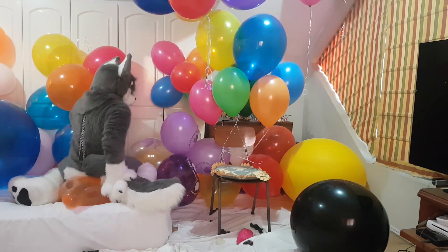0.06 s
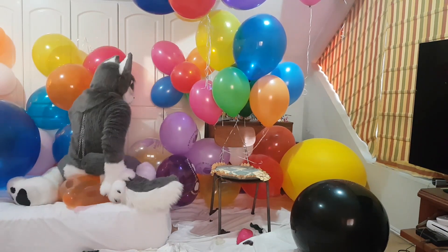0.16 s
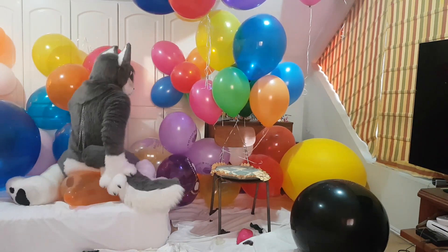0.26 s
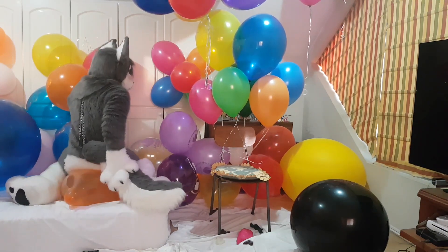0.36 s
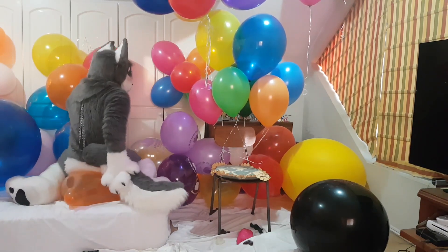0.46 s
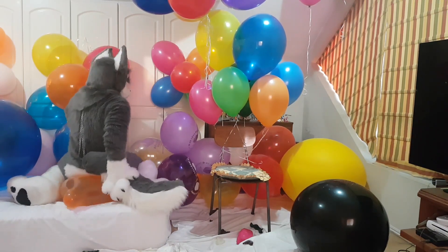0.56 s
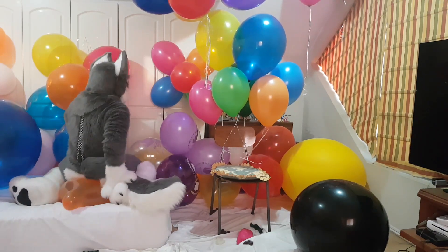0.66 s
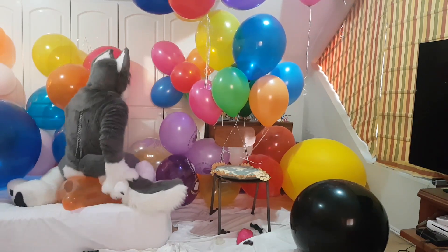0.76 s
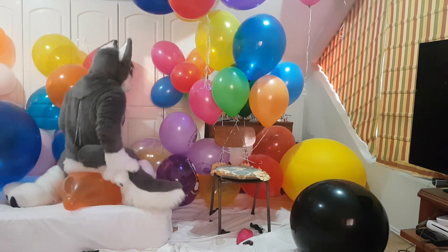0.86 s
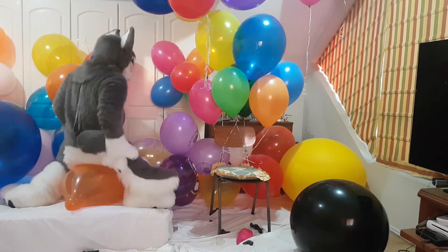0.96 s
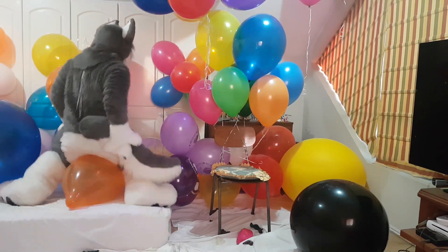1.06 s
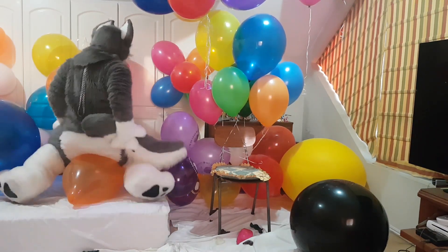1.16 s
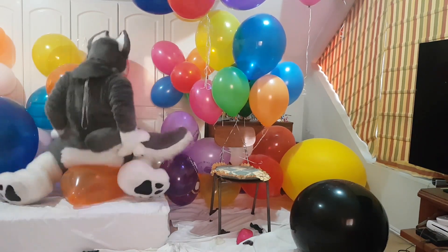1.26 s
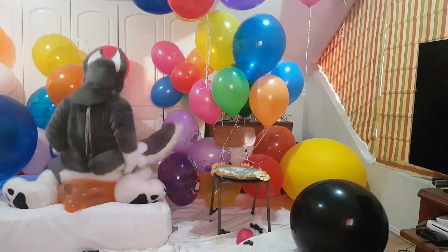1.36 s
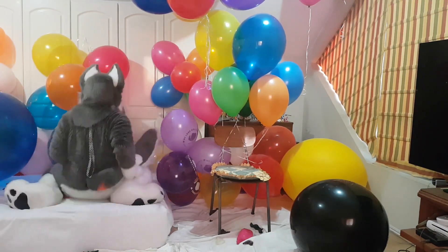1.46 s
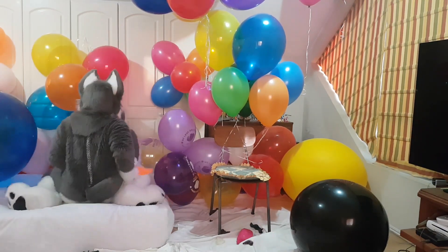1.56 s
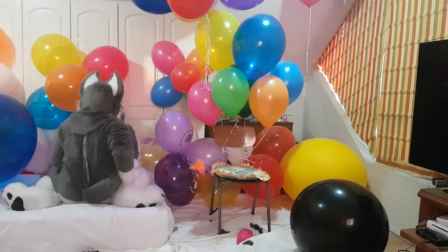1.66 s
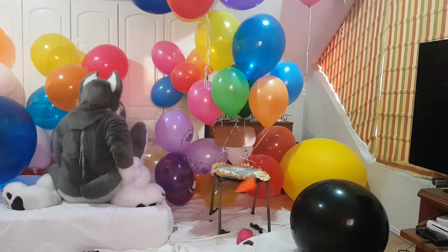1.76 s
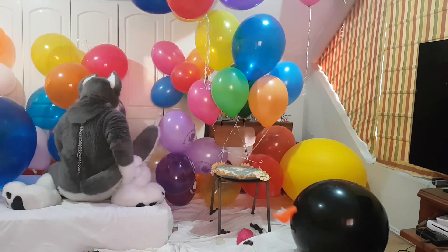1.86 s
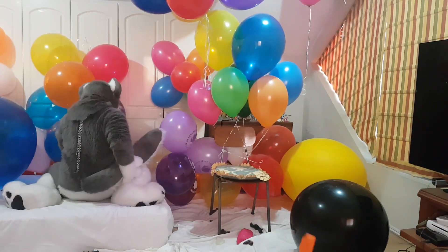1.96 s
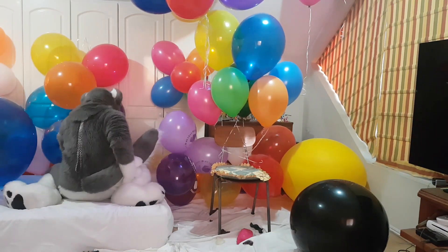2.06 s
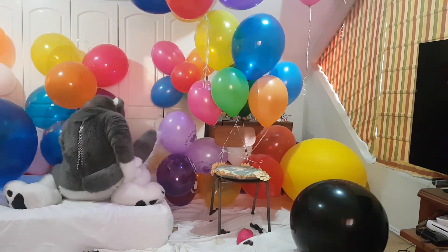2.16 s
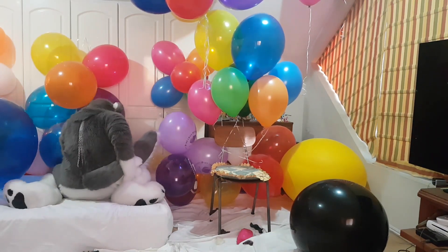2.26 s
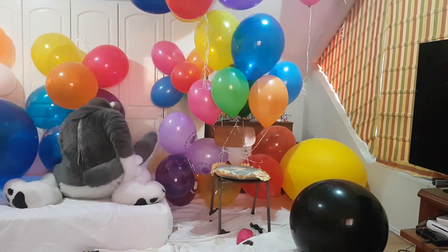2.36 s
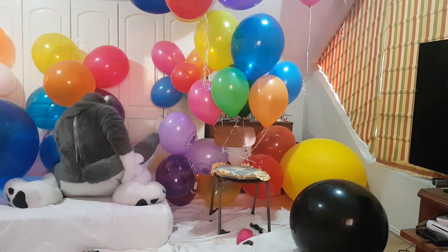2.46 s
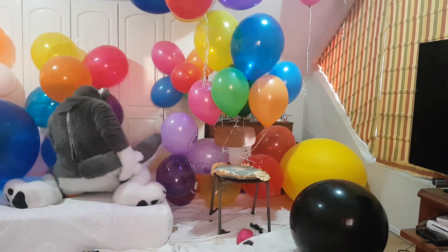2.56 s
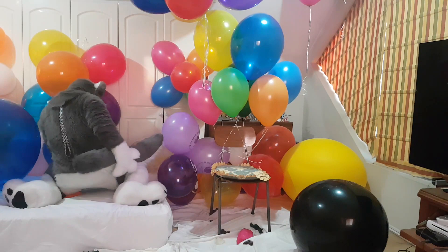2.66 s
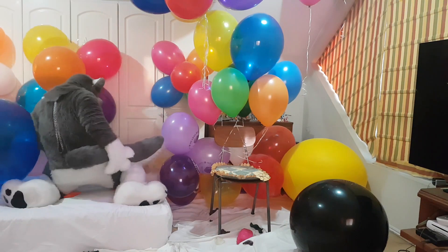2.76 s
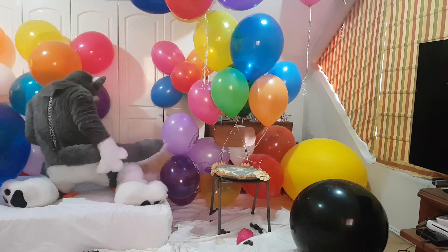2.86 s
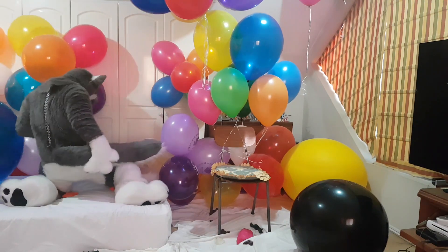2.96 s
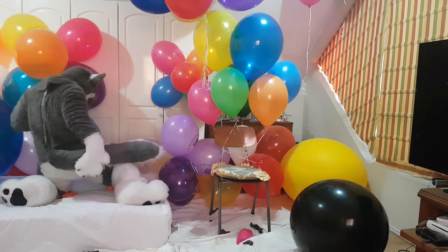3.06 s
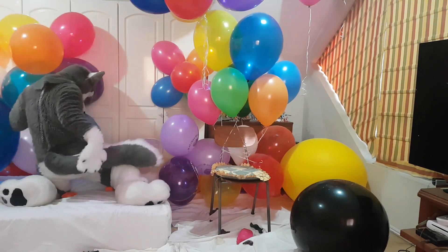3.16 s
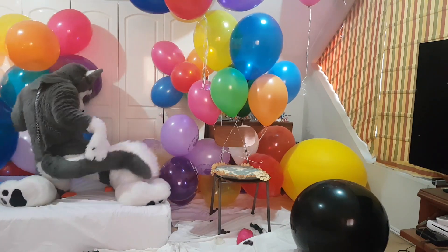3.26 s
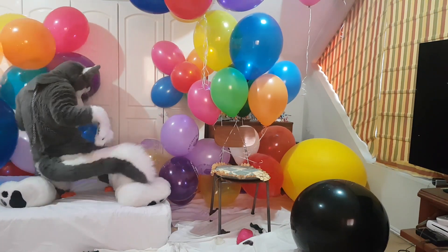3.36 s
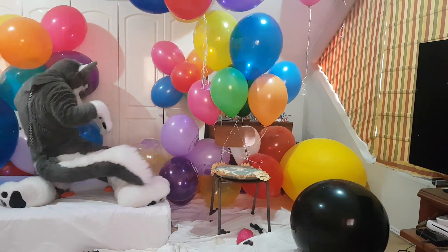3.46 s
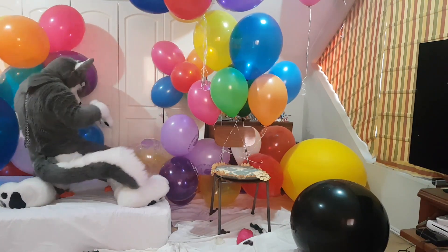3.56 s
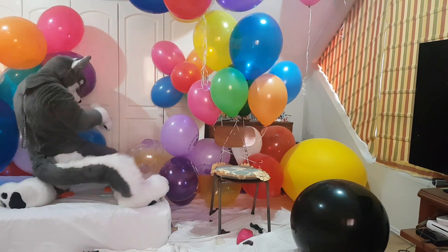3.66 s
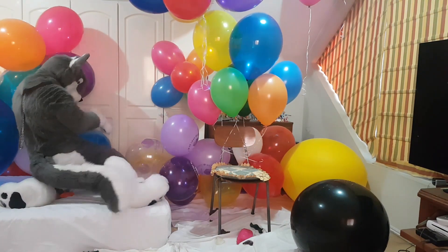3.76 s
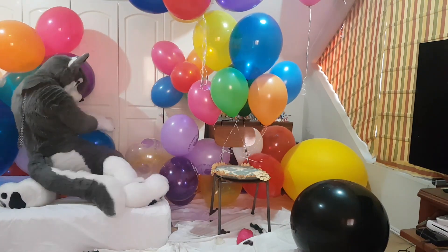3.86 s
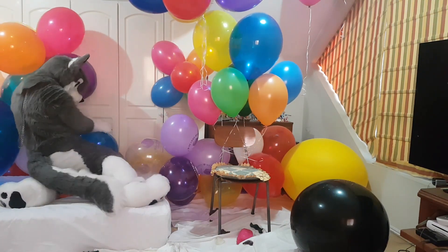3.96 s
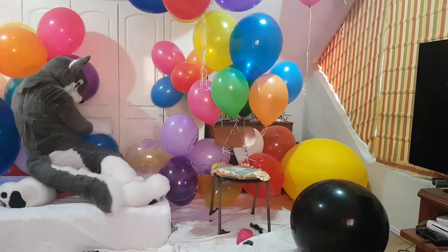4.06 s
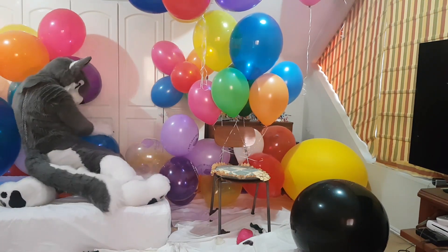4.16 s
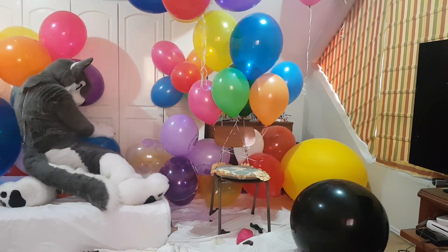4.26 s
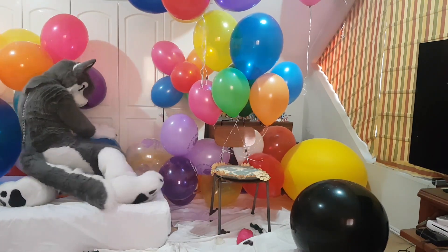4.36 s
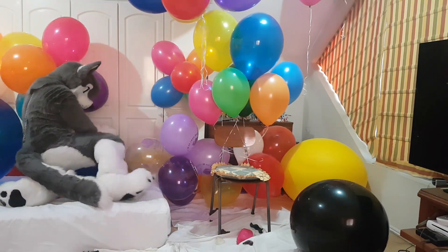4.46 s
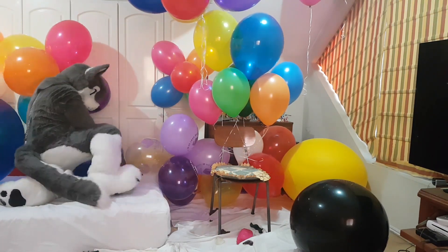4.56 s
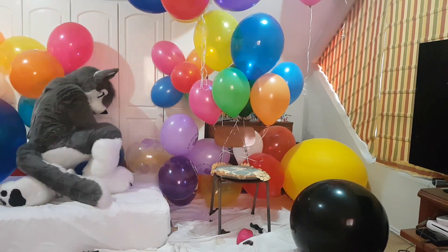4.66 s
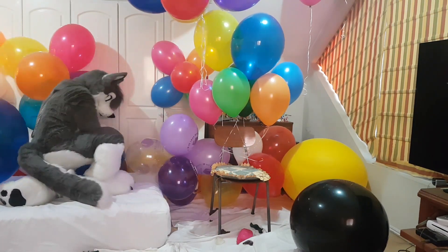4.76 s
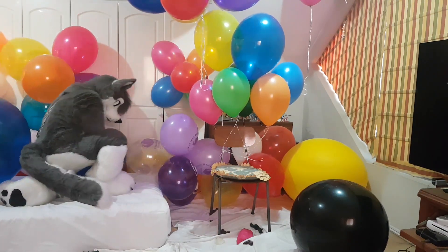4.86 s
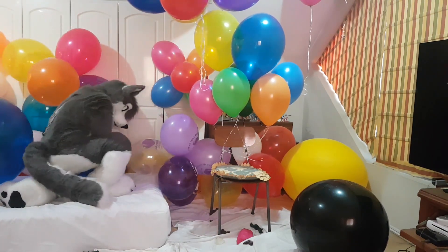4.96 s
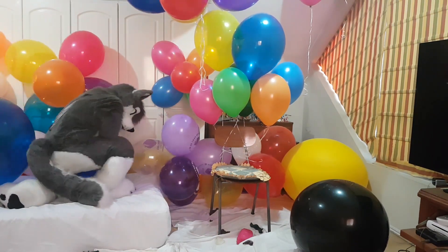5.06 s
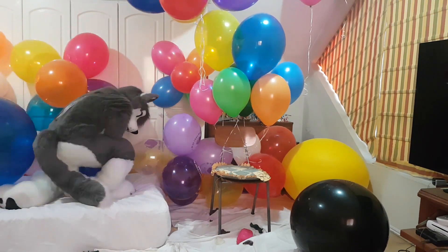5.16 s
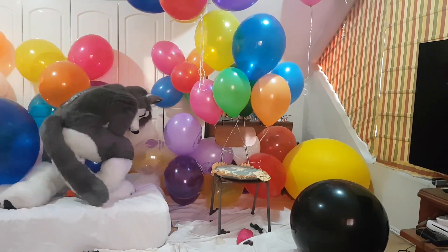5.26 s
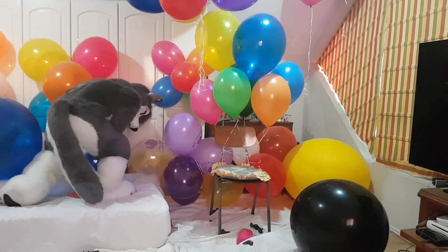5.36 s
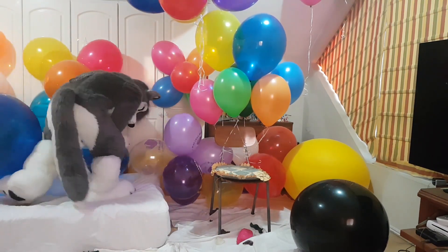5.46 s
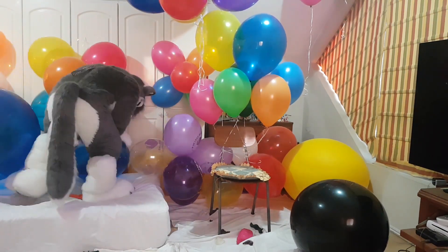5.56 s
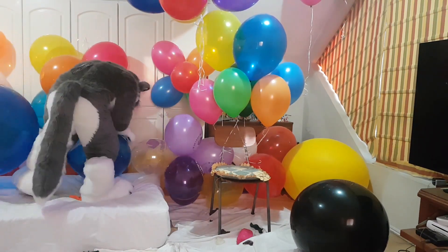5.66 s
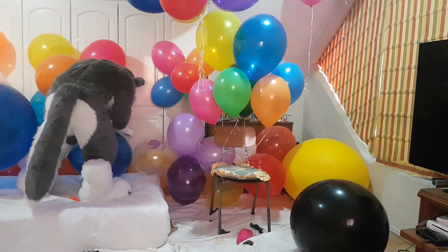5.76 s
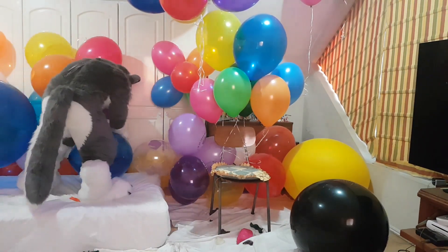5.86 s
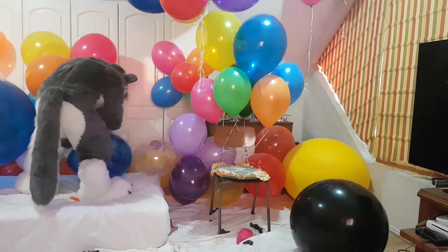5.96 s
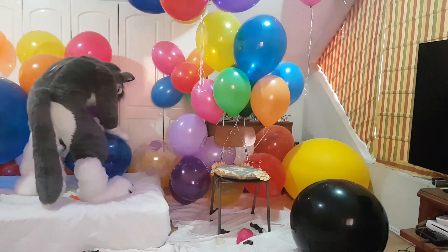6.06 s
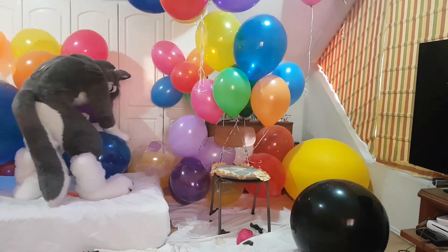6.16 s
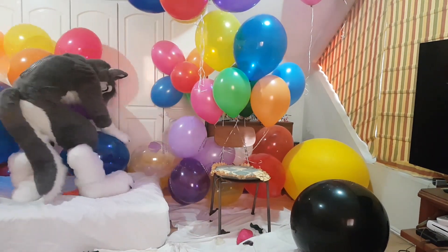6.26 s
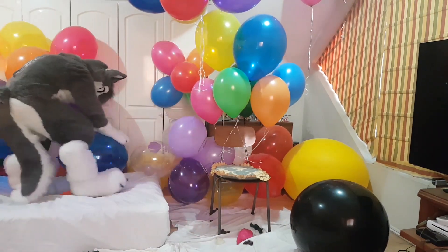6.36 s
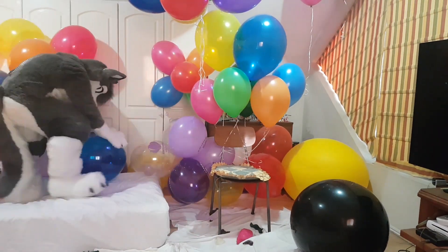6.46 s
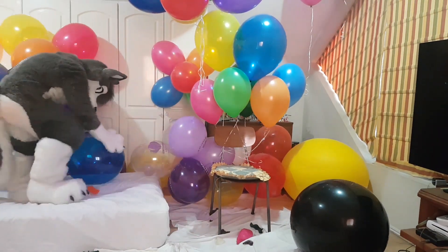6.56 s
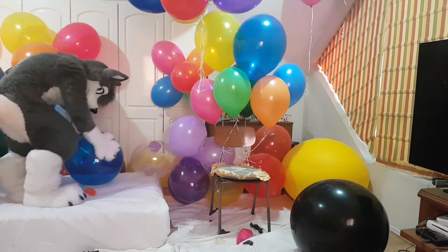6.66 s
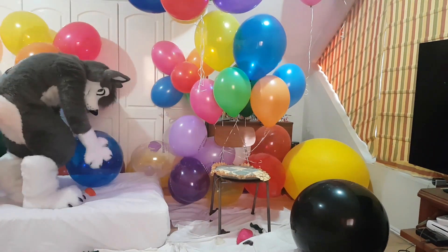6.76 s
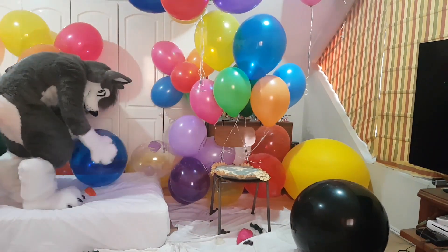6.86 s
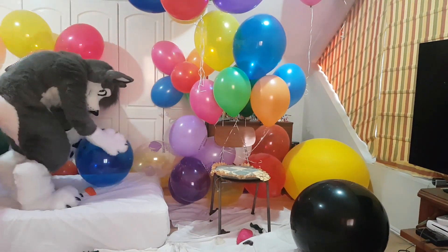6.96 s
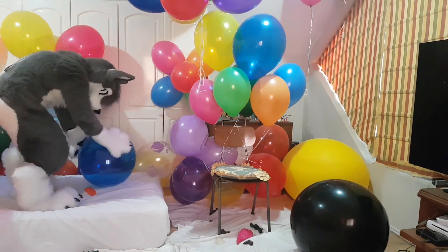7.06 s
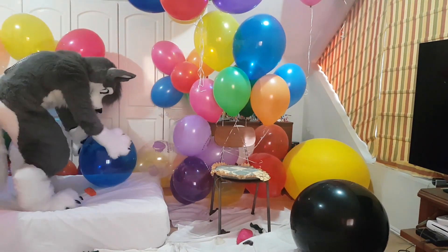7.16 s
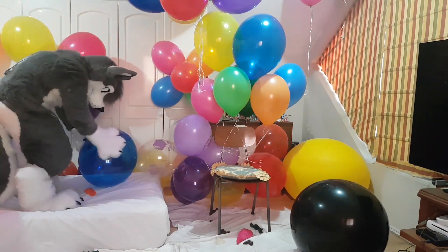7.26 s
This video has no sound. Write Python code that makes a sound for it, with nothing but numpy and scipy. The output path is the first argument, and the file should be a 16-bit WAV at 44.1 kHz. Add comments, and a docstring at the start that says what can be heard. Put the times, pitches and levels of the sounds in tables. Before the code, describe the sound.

In a small room, close stereo microphones catch very quiet fur and bedding rustle. Short, low rubbery creaks come at 0.25 to 0.7 seconds, with a small one near 1.2 as weight shifts softly. At 1.51 a large balloon bursts: a sudden, full-scale, distorted bang with a low push of air, a harsh broadband crack, quick wall echoes and a hollow ring from room and balloons, dying within about half a second. A heavy padded body thump on the mattress merges into it at 1.57. From 2 to 3 it is nearly silent. Faint rustles and light bumps return from 3, with a squeak at 3.8 and a dull creak at 4.5. Around 5.2 a short low latex groan sings out. Bright chirping squeaks follow at 5.55 and 6.0, a rougher squeak with fur brushing at 6.8, then a quick rising squeak near 7.2 amid soft bumps.

```python
"""A large balloon bursts under someone in a fur suit, who drops onto the mattress, close to two microphones.
The freed air pushes and sucks back, its crack scatters round a small room, and other balloons ring on.
Fur and bedding rustle as shaped noise with drawn levels; soft blows ring the bed and press out air.
Latex creaks and squeaks by sticking and slipping as the next balloon is pulled into place.
The bang overloads the recorder, and the rustle behind it is turned down and slowly recovers."""
import sys
import numpy as np
from scipy import signal
from scipy.fft import rfft, irfft
from scipy.io import wavfile
from scipy.ndimage import uniform_filter1d

SR = 44100
rng = np.random.default_rng(int(sys.argv[2]) if len(sys.argv) > 2 else 0)


def generate_wav(signal):
    """Clip the signal to [-1, 1] and save it as 16-bit WAV at the path in sys.argv[1]."""
    frames = np.transpose(np.atleast_2d(signal))
    scaled = np.clip(frames, -1, 1) * 32767
    pcm = np.round(scaled).astype(np.int16)
    wavfile.write(sys.argv[1], SR, pcm)


N = 322812
TIME = np.arange(N) / SR
MIC_SPACING_M = 0.17
EDGE_HZ = 14750  # top of the recorder's band

# Weight shifting onto the bed. Each row: start in seconds, relative knock level in dB,
# relative level of the mattress heave in dB.
SHIFTS_OF_WEIGHT = [(1.234, -41.5, -59), (1.425, -39, -48), (1.641, -9, -45), (3.031, -45, -57),
                    (3.23, -52.5, -63), (3.658, -46, -60), (3.81, -51, -56), (4.02, -53, -56),
                    (4.546, -37.5, -66), (5.78, -49.5, -58), (5.991, -41.5, -46), (6.55, -33, -43),
                    (6.844, -34, -40), (7.096, -37, -42)]
# Level of the bedding rustle: the body's effort, and a recorder turned down by the bang that slowly recovers.
# Each row: time in seconds, relative level in dB.
RUSTLE_LEVEL = [(0, -61), (.8, -61), (1.45, -56.5), (1.95, -67), (2.35, -73.5), (2.8, -66.5), (3.55, -64),
                (3.85, -58.5), (4.5, -53.5), (4.88, -60), (5.2, -53), (5.85, -50.5), (6.25, -55.5),
                (6.52, -45.5), (6.72, -51), (6.9, -44.5), (7.05, -53), (7.32, -55)]


def amp(db):
    """Decibels to gain."""
    return 10 ** (np.asarray(db) / 20)


def unit(x):
    """Scales to rms 1."""
    return x / np.sqrt(np.mean(x ** 2) + 1e-20)


def read(points, hz):
    """Reads a table on a log-frequency axis."""
    f, value = np.transpose(points)
    return np.interp(np.log(hz + 1), np.log(f + 1), value)


def bins(size):
    """Frequencies of a spectrum of this many samples."""
    return np.fft.rfftfreq(size, 1 / SR)


def add(mix, s, sound):
    """Mixes a sound in at time s."""
    part = mix[..., max(round(s * SR), 0):][..., :sound.shape[-1]]
    part += sound[..., :part.shape[-1]]


def wander(size, hz):
    """Slow chance of about rms 1, mostly below hz."""
    noise = rfft(rng.standard_normal(N))
    slow = irfft(noise / (1 + (bins(N) / hz) ** 4), N)
    return unit(slow)[:size]


def diffuse(spectrum, size, likeness=.8):
    """Noise from all sides at two spaced microphones: alike in the bass, unrelated in the treble."""
    hz = bins(size)
    mid, side = rfft(rng.standard_normal((2, size)))
    same = np.clip(likeness, 0, 1) * np.sinc(2 * hz * MIC_SPACING_M / 343)  # speed of sound in m/s
    mid, side = mid * np.sqrt(1 + same), side * np.sqrt(1 - same)
    pair = np.array([mid + side, mid - side])
    return unit(irfft(pair * amp(read(spectrum, hz)), size))


def patchy(x, patchy_db):
    """Ever-changing strength favours small patches of time and frequency, as shifting contacts do."""
    z = signal.stft(x, nperseg=512, noverlap=384)[2]
    patches = rng.standard_normal(z.shape[1:])
    patches = uniform_filter1d(patches, size=4, axis=0)  # across frequency
    patches = unit(uniform_filter1d(patches, size=12, axis=1))  # across time
    uneven = signal.istft(z * amp(patchy_db * patches), nperseg=512, noverlap=384)[1]
    return unit(uneven[:, :N])


def die_away(x):
    """Each band fades at the room's own speed."""
    # Decay of the small room. Each row: frequency in Hz, time to fall 60 dB in seconds.
    room_decay = [(60, 0.34), (200, 0.39), (500, .31), (1000, 0.35), (2500, 0.27), (8000, 0.33),
                  (14000, .24)]
    hz, t, z = signal.stft(x, SR, nperseg=256)
    fade = np.exp(-np.log(1000) * t / read(room_decay, hz)[:, None])
    return signal.istft(z * fade, SR, nperseg=256)[1][:, :x.shape[1]]


def in_room(x, wet_db):
    """Direct sound, then the room's scatter; the body shades the direct treble, so treble is wetter."""
    tail = die_away(diffuse([(300, -6.5), (1200, -5)], size=SR))
    tail[:, :round(.003 * SR)] = 0
    response = amp(wet_db) * tail / np.linalg.norm(tail[0])
    response[:, 0] += 1
    response = response / np.linalg.norm(response[0])
    return signal.fftconvolve(x[None], response, axes=1)[:, :N]


def colour(x, gain):
    """A causal filter from a gain at each whole Hz; the result has rms 1."""
    log_gain = np.log(np.maximum(gain, 1e-5))
    mirrored = np.r_[log_gain, log_gain[-2:0:-1]]
    response = np.exp(signal.hilbert(mirrored).conj())[:len(gain)]  # minimum phase
    return unit(irfft(rfft(x, SR) * response, SR)[:len(x)])


def ring(modes, apart_hz=700):
    """Dying sines after one blow; higher modes differ more in phase between the microphones, to a limit."""
    t, out = TIME[:2 * SR], 0
    for k, (hz, db, t60) in enumerate(modes):
        sign = (-1) ** k
        lead = np.array([[1], [-1]]) * sign * min(hz / apart_hz, np.pi / 4)  # radians
        decay = np.exp(-np.log(1000) * t / t60)
        out = out + sign * amp(db) * decay * np.sin(2 * np.pi * hz * t + lead)
    return out


def loading(sway_db=-24, sway_follow=.7, heave_s=0.035):
    """Levels of bedding and mattress: both follow the rustle level; the mattress heaves after each thump."""
    rustle_db = np.interp(TIME, *np.transpose(RUSTLE_LEVEL))
    mattress_power = amp(sway_db + sway_follow * rustle_db) ** 2
    u = TIME[:SR] / heave_s
    for s, _, heave_db in SHIFTS_OF_WEIGHT:
        heave = amp(heave_db) * u * np.exp(1 - u)
        add(mattress_power, s, heave ** 2)
    return amp(rustle_db), np.sqrt(mattress_power)


def sliding(fidget_fur_db=-11.5, fidget_rub_db=-5.5, ends_db=-9.5, roundness=2.14, rise_s=0.02, decay_s=.043):
    """Levels of fur hiss and latex rubbing: movements swell and ebb in a bell, brushes flick and die."""
    # The body shifts, sliding fur over sheets and balloons. Each row: start in seconds, swell in seconds,
    # fade in seconds, relative fur hiss level in dB, relative latex rubbing level in dB.
    body_moves = [(-0.11, 0.17, 0.14, -59, -62), (0.2, 0.17, 0.49, -59, -62.5),
                  (0.8, 0.33, 0.21, -51.5, -57.5), (1.38, 0.16, 0.055, -44.5, -48),
                  (2.35, 0.33, 0.24, -66.5, -64.5), (2.69, 0.34, 0.18, -55.5, -52.5),
                  (3.14, 0.14, 0.15, -53.5, -49.5), (3.381, 0.044, 0.24, -64.5, -54.5),
                  (3.64, 0.13, 0.31, -57.0, -55.0), (4.0, 0.36, 0.28, -58.5, -59.5),
                  (4.46, 0.057, 0.19, -56.5, -52.0), (4.69, 0.29, 0.25, -67.5, -59.5),
                  (5.05, 0.14, 0.13, -54.5, -46.0), (5.29, 0.12, 0.13, -55, -45),
                  (5.59, 0.22, 0.14, -65, -48.5), (5.94, 0.07, 0.27, -53.5, -47),
                  (6.16, 0.35, 0.13, -51.0, -44.0), (6.59, 0.17, 0.22, -51, -56.5),
                  (7.01, 0.19, 0.38, -56.5, -49.5)]
    # Quick brushes of fur. Each row: start in seconds, relative level in dB.
    fur_brushes = [(0.372, -44.5), (0.492, -59), (1.428, -55), (3.514, -56.5), (3.789, -47.5), (5.14, -50),
                   (5.554, -43.5), (5.998, -47.5), (6.447, -38.5), (6.529, -45), (6.715, -42.5),
                   (6.738, -43.0), (6.812, -34)]
    # Sliding that goes on between movements is set relative to the bedding rustle.
    rustle_db = np.interp(TIME, *np.transpose(RUSTLE_LEVEL))
    fur_power, rub_power = amp(rustle_db + fidget_fur_db) ** 2, amp(rustle_db + fidget_rub_db) ** 2
    for s, swell, fade, fur_db, rub_db in body_moves:
        late = TIME - s - swell
        from_peak = np.minimum(np.maximum(-late / swell, late / fade), 10)
        bell_db = ends_db * from_peak ** roundness  # reaches ends_db at the start and end
        fur_power = fur_power + amp(fur_db + bell_db) ** 2
        rub_power = rub_power + amp(rub_db + bell_db) ** 2
    t = TIME[:SR]
    flick = np.minimum(t / rise_s, np.exp((rise_s - t) / decay_s))
    for s, db in fur_brushes:
        add(fur_power, s, (amp(db) * flick) ** 2)
    return np.sqrt(fur_power), np.sqrt(rub_power)


def rustle(rumble_db=2, bedding_db=2, rub_db=2, hiss_db=3, flutter_db=1):
    """Noises of mattress, bedding, latex and fur, each at its own level, catch and let go together."""
    # Spectra of mattress rumble, bedding, latex rubbing and fur.
    # Each row: frequency in Hz, relative level in dB per Hz.
    rumble_bands = [(10, -20), (38, 4), (62, -9.5), (100, 0), (135, -10.5), (250, -52.5)]
    bedding_bands = [(40, -28.5), (75, -12), (115, 1.5), (200, -2.5), (320, -5.5), (500, -13.5),
                     (1200, -40)]
    rub_bands = [(150, -32.5), (350, 1), (550, -3), (1000, -2), (2000, -3), (3200, -11), (5500, -19),
                 (14000, -41.5)]
    hiss_bands = [(700, -21.5), (2500, -2), (4500, -1), (7000, -2.5), (9000, 0), (12500, 1), (15000, -3.5)]
    bedding_level, rumble_level = loading()
    hiss_level, rub_level = sliding()
    mattress = amp(rumble_db) * rumble_level * diffuse(rumble_bands, size=N, likeness=.5)
    bedding = amp(bedding_db) * bedding_level * diffuse(bedding_bands, size=N)
    latex = amp(rub_db) * rub_level * patchy(diffuse(rub_bands, size=N), patchy_db=2.5)
    fur = amp(hiss_db) * hiss_level * patchy(diffuse(hiss_bands, size=N), patchy_db=0.3)
    return (mattress + bedding + latex + fur) * amp(flutter_db * wander(N, hz=25))


def stroke(swell, fade):
    """Pressure of one stroke: it builds, peaks and lets go."""
    t = TIME[:int((swell + fade) * SR)]
    return np.interp(t, [0, swell, swell + fade], [0, 1, 0]) ** 0.95


def slips(hz, rough, jitter=.12, jitter_hz=130):
    """Pulses of stick and slip with unsteady timing, and a puff of friction noise at each slip."""
    rough = np.clip(rough, 0, 1)
    unsteady_hz = hz * (1 + jitter * rough * wander(len(hz), jitter_hz))
    turns = np.cumsum(unsteady_hz) / SR
    harmonics = np.arange(1, int(EDGE_HZ / hz.max()) + 1)[:, None]
    pulses = np.cos(2 * np.pi * harmonics * turns).sum(0)
    puffs = (0.32 + np.exp(-(turns % 1) / 0.18)) * rng.standard_normal(SR)[:len(hz)]
    return (1 - rough) * unit(pulses) + rough * unit(puffs)


def squeaks(wet_db=1, chatter_db=4, fall_db_per_octave=20, rough_lift_db_per_octave=11.5):
    """Short slips of fur on latex, chattering when rough; the skin radiates little below the slip rate."""
    # Latex sticking and slipping. Each row: start in seconds, swell in seconds, fade in seconds,
    # relative level in dB, first and last nominal slip rate in Hz, roughness 0-1, treble corner in Hz.
    latex_slips = [ (.245, 0.018, 0.031, -49, 320, 357, 0.4, 1000),
                   (.375, .02, .05, -36.5, 386, 181.6, .5, 1000),
                   (.485, 0.021, 0.034, -40.5, 291.3, 252.7, 0.7, 990),
                   (.64, .2, .11, -50, 434, 401.4, .5, 250),
                   (1.163, .015, 0.015, -37.5, 272, 280, .05, 150),
                   (3.02, .024, 0.12, -47, 436, 405, 0.95, 600),
                   (3.25, 0.067, 0.092, -51.5, 471, 510, .38, 330),
                   (3.41, 0.087, 0.068, -52.5, 511, 523, .2, 300),
                   (3.39, 0.03, .05, -50.5, 1546, 1632, .3, 1200),
                   (3.652, 0.015, 0.035, -41.5, 335, 286, 0.68, 710),
                   (3.795, .009, .05, -31.5, 802, 828, .36, 2100),
                   (4.2, 0.074, .038, -49, 345, 402, 0.82, 600),
                   (4.495, 0.034, 0.084, -39, 180.5, 160.6, 0.72, 1050),
                   (5.32, 0.091, .09, -45.5, 419, 379, 0.77, 2260),
                   (5.553, .039, 0.024, -27.5, 692, 884, 0.57, 2000),
                   (5.61, .047, 0.036, -42, 431, 388, 0.67, 1300),
                   (5.796, 0.017, 0.028, -44, 1090, 1080, 0.37, 800),
                   (5.89, .018, 0.01, -41, 1043, 1120, 0.37, 790),
                   (5.942, .012, 0.028, -44.5, 1473, 1280, 0.42, 1210),
                   (5.955, 0.049, .018, -37, 827, 790, 0.64, 2660),
                   (6.008, .02, .016, -27.5, 890.5, 1012, .52, 1520),
                   (6.029, 0.044, .07, -42, 431.4, 517, .5, 1300),
                   (6.299, 0.08, 0.15, -41.5, 344, 286.2, 0.39, 700),
                   (6.797, 0.013, 0.014, -37.5, 1060, 982, 0.59, 1700),
                   (6.817, 0.0097, 0.055, -30.5, 499.6, 428, 0.7, 4320),
                   (6.823, 0.0098, 0.032, -32.5, 2455, 2270, .6, 3700),
                   (7.162, 0.059, .025, -40.5, 649, 1755, 0.27, 1200),
                   (7.18, 0.02, 0.16, -47, 1065, 1040, 0.44, 1100)]
    out, hz = np.zeros(N), bins(SR)
    for s, swell, fade, db, first_hz, last_hz, rough, corner_hz in latex_slips:
        press = stroke(swell, fade)
        press = press * amp(chatter_db * rough * wander(len(press), hz=45))
        drive = slips(np.linspace(first_hz, last_hz, len(press)), rough)
        # Treble falls above the corner; rough slips are brighter.
        fall_db = fall_db_per_octave - rough_lift_db_per_octave * rough
        octaves_over = np.log2(1 + (hz / corner_hz) ** 4) / 4
        bass_loss = 1 - np.exp(-(hz / (0.54 * first_hz)) ** 4)
        skin = amp(-fall_db * octaves_over) * bass_loss
        add(out, s, amp(db) * press * colour(drive, skin))
    return in_room(out, wet_db)


def bed(landing_db=-1, padding_db=-11, soft_s=0.0051, squash_s=.042, dulling=.09, pivot_hz=165):
    """Soft blows ring the bed and press air from the padding; the lighter the blow, the duller its ring."""
    # Bed and floor under the falling body. Each row: frequency in Hz, relative level in dB before dulling,
    # time to fall 60 dB in seconds.
    bed_modes = [(88, -17, .25), (122, -11, .22), (170, -2, .25), (210, -5, .22), (247, 0, .27),
                 (310, -7, .27)]
    # Air pressed out of the mattress. Each row: frequency in Hz, relative level in dB per Hz.
    padding_bands = [(40, -21), (90, -2.5), (170, -2), (300, 0.5), (450, -8), (900, -23), (2000, -45.5)]
    t, out = TIME[:SR], np.zeros((2, N))
    landing = (1.574, landing_db)  # the body lands, s
    for s, db, *_ in [landing] + SHIFTS_OF_WEIGHT:
        modes = [(hz, level + dulling * db * np.log2(hz / pivot_hz), t60) for hz, level, t60 in bed_modes]
        knock = ring(modes, apart_hz=450)[:, :SR]
        puff = amp(padding_db) * diffuse(padding_bands, size=SR) * np.exp(-t / squash_s)
        soft_start = 1 - np.exp(-t / soft_s)
        add(out, s, amp(db) * (knock + puff) * soft_start)
    return out


def burst(burst_s=1.5108, scatter_db=3, build_s=0.004, rings_db=-1):
    """Freed air pushes, then sucks back; the crack of the tearing skin scatters unevenly round the room."""
    # The blast and its echoes from the nearest walls. Each row: start in seconds, relative level in dB,
    # length of the push in seconds.
    blast_pushes = [(1.5104, 4.5, .0009), (1.5141, 6, .0012), (1.54, 3.5, .0008), (1.5632, -0.5, .001)]
    # The bang as the room scatters it. Each row: frequency in Hz, relative level in dB per Hz.
    bang_bands = [(30, -29.5), (60, -14.5), (110, 0), (230, 3.5), (450, 4.5), (700, 5), (1200, -0.5),
                  (1900, -2.5), (2900, -3.5), (5000, -6.5), (9000, -9), (13000, -6.5), (15000, -7.5)]
    # Room modes and nearby balloons set ringing by the burst. Each row: frequency in Hz,
    # relative level in dB, time to fall 60 dB in seconds.
    ring_modes = [(114, -37, 1.15), (175.6, -17.5, 0.44), (246, -11, 0.37), (308, -17, .35),
                  (800, -12.5, 0.27), (955, -24, .52), (1227, -25, 0.51), (1380, -37.5, 0.64),
                  (1577, -11, 0.22), (1863, -9, 0.18), (2110, -15.5, .18), (2417, -11, 0.21),
                  (2680, -13.5, 0.28)]
    t, out = TIME[:SR], np.zeros((2, N))
    for s, db, push_s in blast_pushes:
        add(out, s, amp(db) * (1 - t / push_s) * np.exp(-t / push_s))
    crack = patchy(diffuse(bang_bands, size=N), patchy_db=3.0)[:, :SR]
    scatter = die_away(crack) * (1 - np.exp(-t / build_s))
    add(out, burst_s, amp(scatter_db) * scatter)
    add(out, burst_s, amp(rings_db) * ring(ring_modes))
    return out


def groan():
    """Slow, nearly regular slipping makes the whole balloon sing low."""
    # A knee drags slowly over taut latex. Each row: time in seconds, nominal slip rate in Hz,
    # relative level in dB.
    knee_drag = [(5.039, 202.4, -61.5), (5.082, 202.8, -42), (5.11, 207, -35), (5.144, 213.7, -29),
                 (5.175, 221.9, -27), (5.189, 227.2, -20.3), (5.218, 231, -22), (5.24, 223.5, -32.5),
                 (5.275, 230, -70)]
    # The groan's colour. Each row: frequency in Hz, relative gain in dB.
    balloon_body = [(100, -18.5), (210, -6.5), (330, -22), (455, 0.5), (660, -18.5), (910, -10.5),
                    (1120, -22.5), (1360, -19), (1700, -34), (2600, -36.5), (5000, -52), (14000, -59)]
    s, rate_hz, db = np.transpose(knee_drag)
    t, out = np.arange(s[0], s[-1], 1 / SR), np.zeros(N)
    drive = slips(np.interp(t, s, rate_hz), rough=.34, jitter=.085)
    song = colour(drive, amp(read(balloon_body, bins(SR))))
    add(out, s[0], song * amp(np.interp(t, s, db)))
    return in_room(out, wet_db=-7)


def scene():
    """All sources, a little stronger on the right."""
    return (burst() + bed() + squeaks() + groan() + rustle()) * amp([[-.3], [.3]])


def record(dry, threshold_db=-15, squeeze=0.31, react_s=0.011):
    """A compressor reacts too late for the bang, which is rounded off near full scale; then the band limit."""
    power = signal.lfilter(np.ones(256) / 256, 1, (dry ** 2).mean(0))
    power_db = 10 * np.log10(abs(power) + 1e-12)
    keep = np.exp(-1 / (react_s * SR))
    wanted_cut_db = squeeze * np.maximum(power_db - threshold_db, 0)
    cut_db = signal.lfilter([1 - keep], [1, -keep], wanted_cut_db)
    loud = dry * amp(-cut_db)
    clipped = .92 * loud / (1 + loud ** 4) ** .25
    band_limit = signal.firwin(401, EDGE_HZ, window=("kaiser", 8), fs=SR)
    return signal.oaconvolve(clipped, band_limit[None], "same")


dry = scene()
out = record(dry)
generate_wav(out)
```